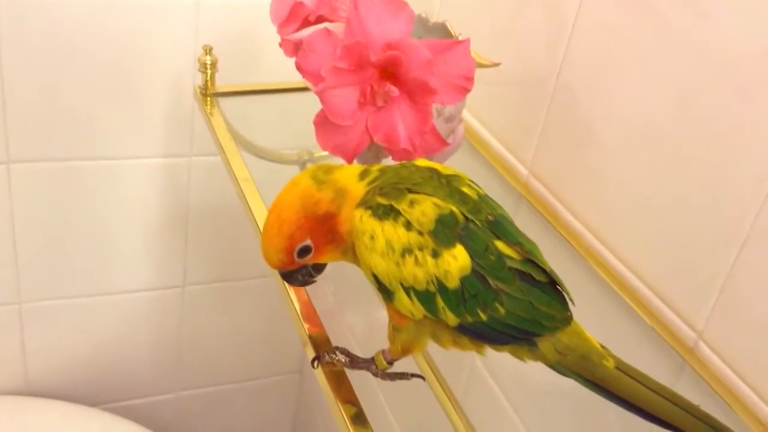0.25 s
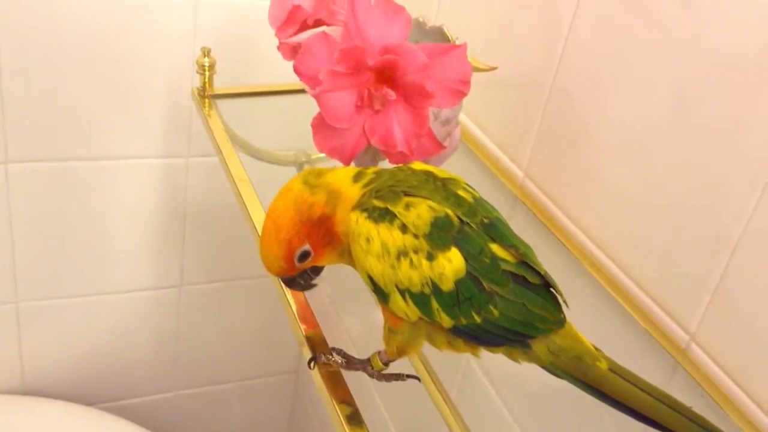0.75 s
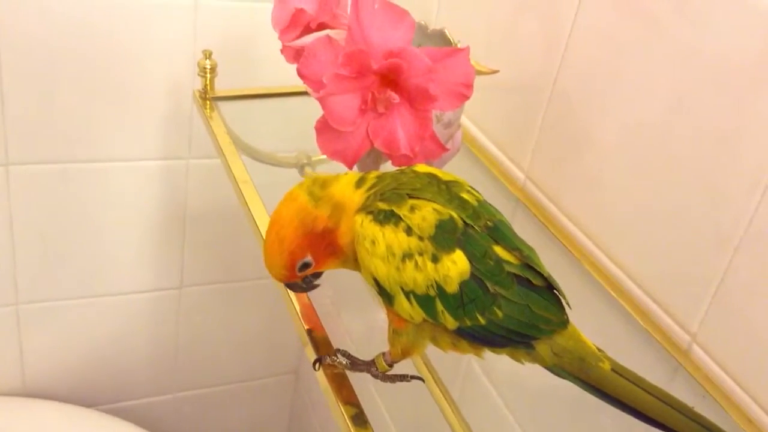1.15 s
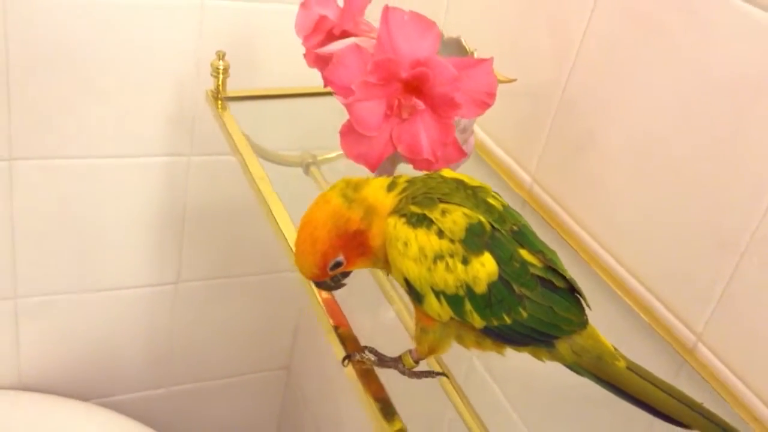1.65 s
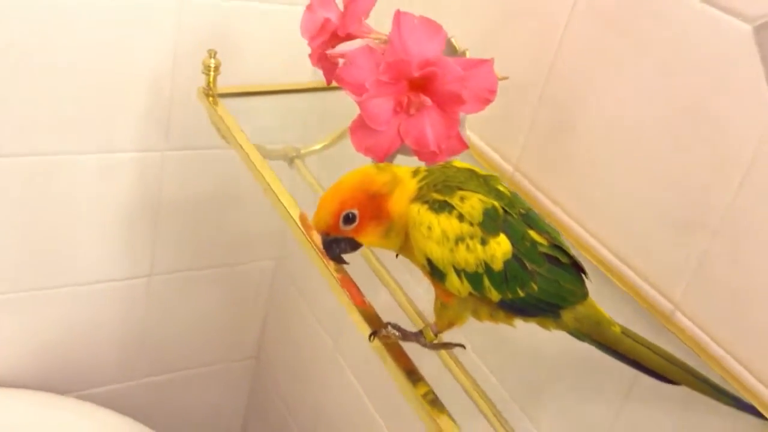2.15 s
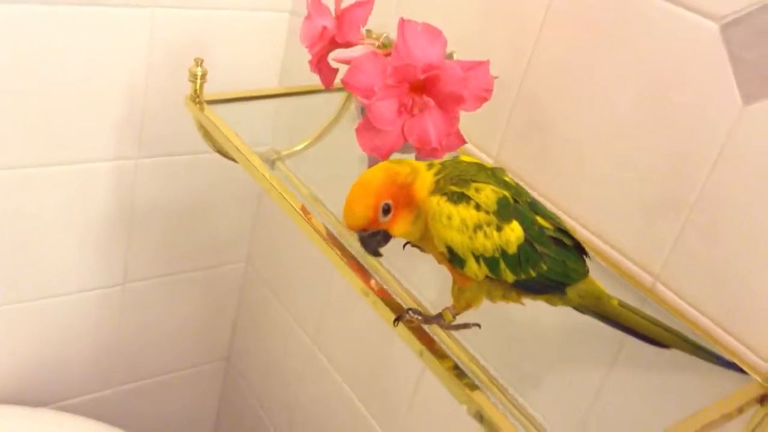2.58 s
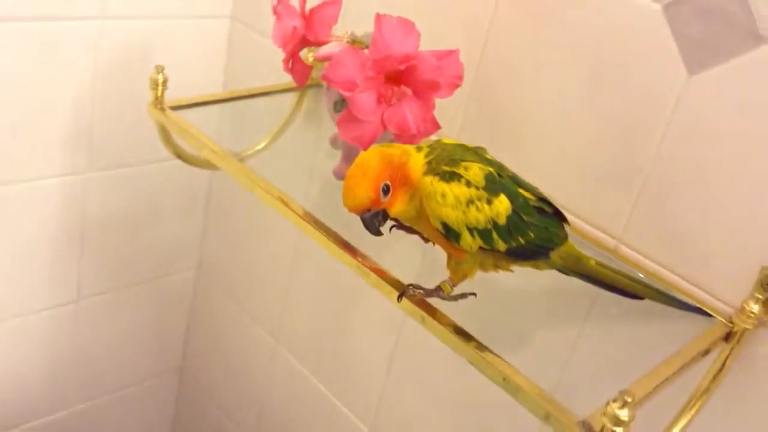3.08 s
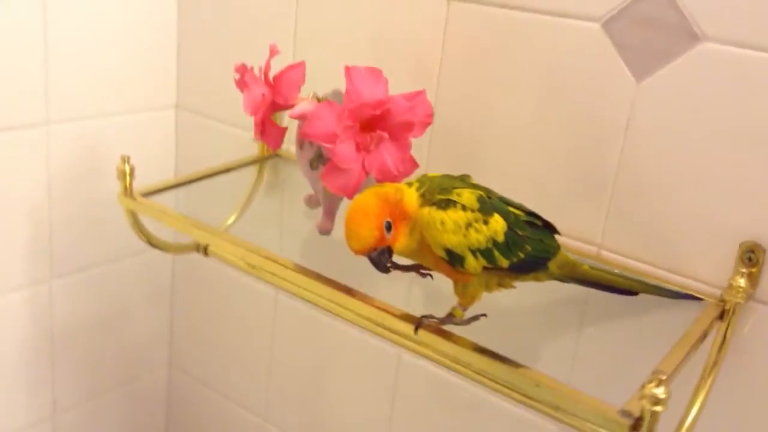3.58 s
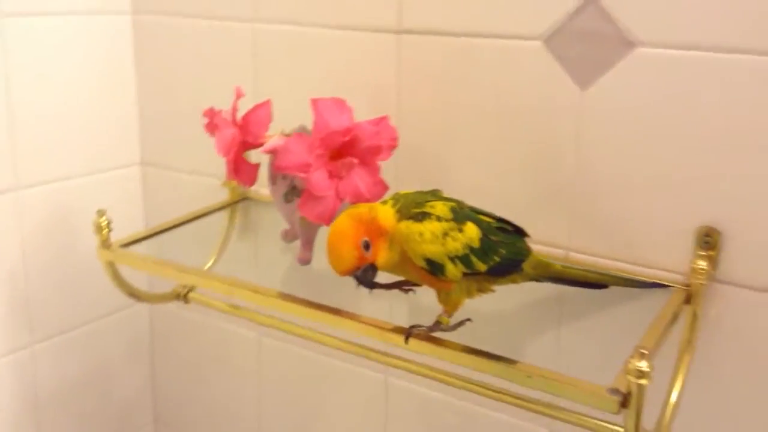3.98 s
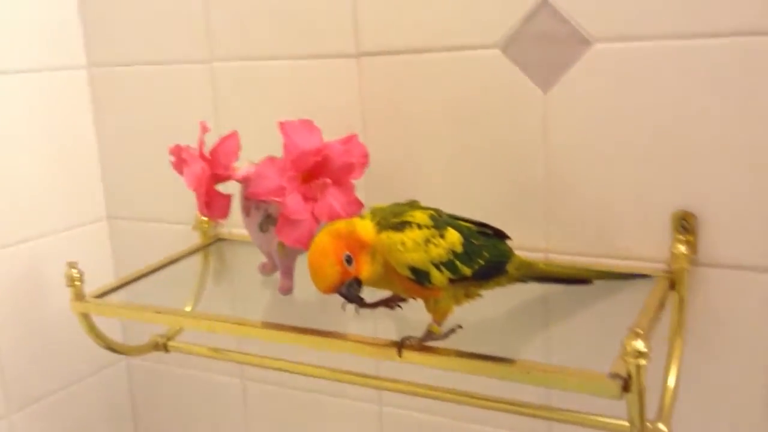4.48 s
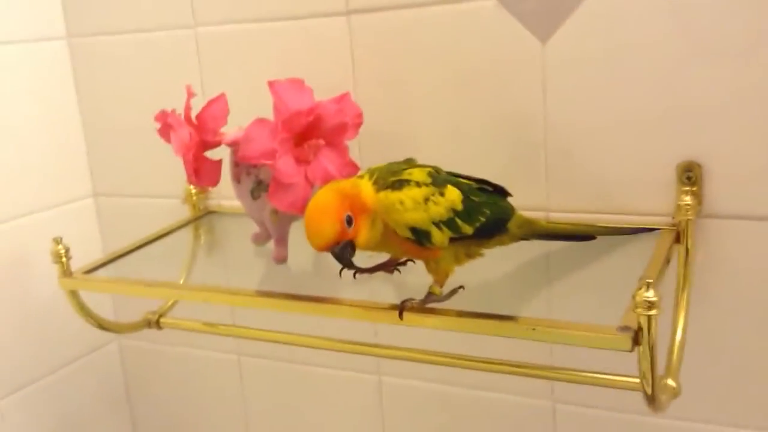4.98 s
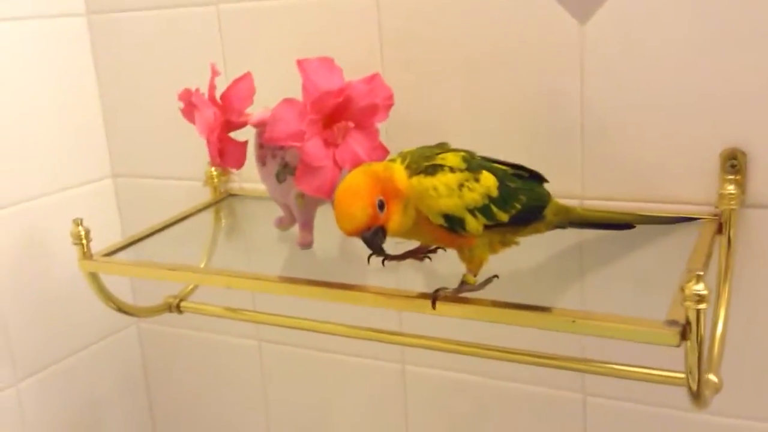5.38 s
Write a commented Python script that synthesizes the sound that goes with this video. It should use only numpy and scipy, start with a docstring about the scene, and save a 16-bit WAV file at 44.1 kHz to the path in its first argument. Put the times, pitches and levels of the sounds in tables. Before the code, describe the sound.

A faint airy hiss with a thin whine and a barely audible wavering hum lies under everything. Bright, ticking splashes begin at about 0.1 s, as a thin trickle breaks into irregular drops in a bathtub. Low bubble chirps bend upward at 0.2 to 0.5 s. A denser cluster peaks near 0.8 to 1.0 s with a hard, wide smack and hollow plinks. Drops continue unevenly, with a crisp splash near 1.4 s and another strong one around 2.15 s. From 3 s, short bubble blips mix with high ticks; a splash pair lands near 3.6 s. Soft dry knocks come close by at 3.8, 4.8 and 5.0 s. A full, round bubble plink stands out at 4.6 s, with more plops at 4.9, 5.2, 5.3 and 5.6 s. Fine spray and falling droplets patter throughout, with short, bright tiled-room reflections.

```python
"""Bright splashes tick first over a faint hum and hiss: a thin trickle breaks into drops above a bathtub.
Splashes are decaying noise bands around a damped ring; some drops trap a bubble, a sine that chirps upward.
Droplets fall back after the splashes, fine spray patters, tiny bubbles ping and dull knocks sound close by.
Random echoes stand for the tub walls and small tiled room; coloured noise and wavering sines lie beneath."""
import sys
import numpy as np
from scipy import signal
from scipy.fft import rfft, irfft
from scipy.io import wavfile

SR = 44100
rng = np.random.default_rng(int(sys.argv[2]) if len(sys.argv) > 2 else 0)


def wrap_up_sound(samples):
    """Save the sound to the file named by the first command line argument, as 16-bit audio."""
    columns = np.atleast_2d(samples).T
    # keep every value between -1 and 1, then stretch to whole-number steps
    tamed = np.clip(columns, -1, 1)
    steps = np.round(tamed * 32767).astype(np.int16)
    wavfile.write(sys.argv[1], SR, steps)


N = 248724  # scene length, samples
T = np.arange(SR // 4) / SR  # time within one event, s
TOP_HZ = 15400  # upper limit of the sound


def undb(db):
    """Decibel law: convert a level in dB to an amplitude factor."""
    return 10 ** (np.asarray(db) / 20)


def fade(t60):
    """Exponential decay: the amplitude falls by 60 dB in t60 seconds."""
    return np.exp(-np.log(1000) * T / t60)


def band(x, lo_hz, hi_hz, order=2):
    """Band limitation: a causal Butterworth band-pass."""
    edges = [lo_hz, min(hi_hz, SR / 2 - 1)]
    return signal.sosfilt(signal.butter(order, edges, "band", fs=SR, output="sos"), x)


def onset_rms(x):
    """Root-mean-square measure of an event's first 20 ms."""
    return np.sqrt(np.mean(x[:SR // 50] ** 2) + 1e-20)


def burst_level(x, db):
    """Level normalisation: set the rms of the first 20 ms to db."""
    return x * undb(db) / onset_rms(x)


def add(out, s, x):
    """Superposition: mix an event in at time s."""
    i = int(np.clip(s * SR, 0, N - 1))
    out[i:i + len(x)] += x[:N - i]


def tiles(x, wet_db, t60, slap_db):
    """Early reflection and reverberation: tub walls slap back, then the tiled room rings; echoes vary by call."""
    grain, tail = rng.standard_normal((2, len(T)))
    # cubing the noise makes the early slaps sparse
    slaps = grain ** 3 * fade(0.061) * (T > .0025)
    tail = tail * fade(t60) * np.minimum(T / 0.019, 1)
    echo = undb(slap_db) * slaps / np.linalg.norm(slaps)
    echo = echo + undb(wet_db) * tail / np.linalg.norm(tail)
    echo[0] += 1  # direct sound
    return signal.fftconvolve(x, echo)[:len(x)]


# Drops that trap a bubble. Columns: t/s, initial f/Hz, level/dB (before the common gain), life/s,
# pitch rise by the end of life/octaves, impact crack level re the tone/dB
BUBBLE_DROPS = [(.193, 753, -48, 0.075, 1.45, -16), (.323, 1833, -54.5, 0.026, 0.38, -9),
                (.482, 793, -51.5, 0.07, 1.6, -3), (.817, 1292, -40, 0.029, 0.19, -6.5),
                (.884, 944, -43, 0.023, 0.26, 2.5), (.900, 1140, -42.5, 0.0095, 0.26, 4.5),
                (1.043, 1134, -44.5, 0.041, 0.17, -3.5), (1.065, 1660, -48, 0.0068, 0.23, -4.5),
                (1.500, 1460, -50, 0.015, 0.5, 13), (1.532, 1412, -45, 0.015, 0.21, -15),
                (1.735, 788, -54, 0.043, 1.5, -25), (1.945, 1116, -60.5, 0.021, 0.04, -23),
                (2.117, 1144, -50, 0.023, 0.16, -15), (2.282, 1252, -54, 0.029, .7, -1),
                (2.369, 1403, -43, 0.025, 0.086, -1.5), (2.460, 1018, -49.5, .019, 0.042, -11),
                (2.552, 1260, -61.5, .02, .1, 2), (3.004, 882, -46, .022, 1.25, -12),
                (3.02, 1962, -45, 0.0044, 0.11, -27), (3.089, 2290, -54, 0.004, .2, -1),
                (3.216, 1558, -43, 0.0067, 0.15, -4.5), (3.510, 798, -50.5, 0.023, 0.055, -13),
                (3.723, 1820, -52, 0.0033, 0.13, -10), (3.803, 739, -55, 0.038, 0.038, -10),
                (3.877, 1367, -53.5, 0.017, 0.91, -2), (4.137, 1360, -44.5, 0.0096, 0.29, -8.5),
                (4.233, 1030, -54.5, 0.0091, 0.19, -12), (4.269, 1430, -61, 0.0098, 0.36, -12),
                (4.309, 1426, -57.5, 0.014, 0.91, -3), (4.467, 732, -44.5, 0.012, 0.039, -23),
                (4.503, 767, -51, 0.021, 0.83, -20), (4.524, 1430, -52, 0.0052, 0.58, -27),
                (4.549, 1373, -51, 0.015, 0.076, -5), (4.632, 867, -37.5, .03, 0.027, -17),
                (4.65, 1364, -47, 0.014, 0.15, -9.5), (4.880, 1249, -44, .034, 0.025, -6),
                (5.233, 900, -43, 0.025, 0.036, -8.5), (5.332, 755, -43.5, 0.041, 1.35, -31),
                (5.63, 765, -43, 0.053, .1, -25)]


def bubbles(sag=0.99, crack_t60=0.0077, burst_db=-13, burst_t60=0.14, gain_db=1):
    """Bubble resonance: after the impact crack, trapped air rings, rises in pitch near the surface and bursts."""
    out = np.zeros(N)
    for s, hz, db, life, octaves, crack_db in BUBBLE_DROPS:
        age = np.minimum(T / max(life, .003), 1.2)  # in lifetimes
        # the fourth power holds the chirp back until late in life
        pitch = hz * 2 ** (octaves * np.minimum(age, 1.05) ** 4)
        attack = 1 - np.exp(-T / 0.0012)
        cutoff = np.clip((1.05 - age) / 0.025, 0, 1)
        swell = attack * np.exp(-sag * age) * cutoff
        tone = np.sin(2 * np.pi * np.cumsum(pitch) / SR) * swell

        impact, froth = rng.standard_normal((2, len(T)))
        crack = band(impact * fade(crack_t60), 0.81 * hz, 1.66 * hz, order=3)
        drop = burst_level(tone, 0) + burst_level(crack, crack_db)

        # the further it has risen, the wetter the spatter as it breaks the surface
        spatter = band(froth ** 3 * fade(burst_t60), 1.3 * hz, 2.48 * hz, order=3)
        spatter = octaves * burst_level(spatter, burst_db)
        drop = drop + np.interp(T - 0.69 * life, T, spatter, left=0)

        # echoes reshape the drop but leave its total energy unchanged
        heard = tiles(drop, wet_db=-1.5, t60=0.2, slap_db=1.5)
        energy = np.linalg.norm(burst_level(drop, db + gain_db))
        add(out, s, heard / np.linalg.norm(heard) * energy)
    return out


# a gentle drop rings on one note, a hard one smacks across the whole range
RING_DB, RING_DB_PER_OCTAVE = 4, -24
TICK_LO_HZ = 8150
WALL_ECHO_S, WALL_ECHO_DB = .008, -13  # nearest side of the tub; the delay varies by splash

# Drops striking the water. Columns: t/s, centre f/Hz, body level/dB,
# spread of the smack either side of f/octaves, level of the sharp tick on top/dB
SPLASH_DROPS = [(0.081, 5800, -49.5, 1.1, -50.5), (.109, 6400, -51.5, 0.6, -59),
                (0.263, 2060, -53.5, 0.39, -65), (0.306, 3540, -52.5, 0.17, -80),
                (.320, 2820, -50, .9, -56.5), (.399, 5160, -42, 0.88, -57), (0.454, 3780, -55.5, .3, -68),
                (.473, 5830, -57, 0.14, -79), (0.568, 12400, -56.5, .12, -69),
                (.633, 11600, -62, 0.29, -50), (0.695, 3420, -52, 0.33, -66), (0.819, 2870, -50, 0.69, -56),
                (0.8845, 5430, -35.5, 0.79, -61), (.937, 5150, -44, 0.46, -50.5),
                (1.133, 5650, -49, 0.65, -59), (1.176, 3900, -51, .95, -57.5),
                (1.359, 4800, -52.5, 0.43, -62), (1.392, 9300, -53.5, 0.49, -61),
                (1.420, 6970, -43, 0.17, -50.5), (1.504, 2840, -53.5, 0.79, -62),
                (1.614, 6700, -51, 0.65, -56), (1.795, 5700, -44.5, 0.42, -56),
                (1.856, 11200, -53.5, .25, -53), (1.943, 4660, -48, 0.11, -70),
                (2.015, 3920, -44.5, 0.42, -65), (2.11, 6950, -54.5, .25, -55.5),
                (2.154, 3990, -38.5, 0.34, -54), (2.223, 3650, -50, 0.37, -57),
                (2.297, 6640, -57, 0.22, -58), (2.326, 8800, -58, 0.12, -55), (2.369, 4740, -54, 0.63, -62),
                (2.492, 5960, -51.5, 0.45, -70), (2.601, 3920, -51, 0.11, -63),
                (2.622, 3800, -43.5, 0.54, -51), (2.712, 3400, -57.5, 0.34, -84),
                (2.807, 11900, -55, 0.37, -54), (2.914, 5400, -58, 0.77, -55), (2.945, 6700, -58, .45, -78),
                (3.022, 5730, -52.5, 0.97, -68), (3.089, 9900, -49.5, 0.37, -49.5),
                (3.322, 4900, -55, 0.54, -70), (3.334, 7950, -49, 0.24, -53), (3.392, 8900, -52, 0.14, -50),
                (3.448, 8300, -56, 0.48, -62), (3.615, 4120, -51.5, 0.081, -74),
                (3.621, 2535, -42, 0.31, -70), (3.663, 2450, -46.5, 0.21, -83),
                (3.671, 3340, -49.5, 0.4, -85), (3.720, 7660, -66, 0.51, -50.5),
                (3.941, 4070, -53.5, .2, -59), (4.121, 6980, -49, 0.12, -60), (4.173, 3260, -51, 0.33, -82),
                (4.346, 7340, -56, 0.34, -64), (4.402, 4240, -49, 0.18, -51.5),
                (4.547, 2180, -60.5, 0.48, -70), (4.569, 2620, -54.5, 0.33, -82),
                (4.682, 7160, -55.5, 0.15, -71), (4.746, 5950, -57.5, .12, -67),
                (4.77, 6900, -55.5, .3, -67), (4.864, 3400, -55, 0.51, -65),
                (4.947, 2240, -52.5, 0.093, -50), (5.036, 6200, -50.5, .25, -55),
                (5.0794, 4100, -43.5, 0.85, -68), (5.232, 2080, -49.5, 0.33, -61),
                (5.439, 7100, -62, 0.091, -57.5)]


def splashes(ring_cycles=45, snap_t60=0.0065, fizz_db=-7, fizz_t60=0.077, skirt_db=-21, skirt_lo_hz=2300):
    """Impact excitation: a smack and fizz of fine droplets surround a tiny, quickly damped bubble's ring."""
    out = np.zeros(N)
    for s, hz, db, spread, tick_db in SPLASH_DROPS:
        smack, droplets = rng.standard_normal((2, len(T)))
        snap = burst_level(smack * fade(snap_t60), 0)
        # the fifth power turns noise into sparse grains
        snap = snap + burst_level(droplets ** 5 * fade(fizz_t60), fizz_db)
        phase = 2 * np.pi * hz * T * (1 + 2 * np.minimum(T, .03))  # glides up at first
        ring = np.sin(phase) * fade(ring_cycles / hz)

        ratio = 2 ** max(spread, .05)
        core = burst_level(band(snap, hz / ratio, hz * ratio, order=3), 0)
        skirt = burst_level(band(snap, skirt_lo_hz, TOP_HZ, order=3), skirt_db)
        ring = burst_level(band(ring, hz / 2, hz * 2), RING_DB + RING_DB_PER_OCTAVE * spread)
        body = core + skirt + ring
        tick = band(snap, TICK_LO_HZ, TOP_HZ, order=3)

        lag = int(WALL_ECHO_S * SR * rng.uniform(0.86, 1.3))
        for part, part_db in (body, db), (tick, tick_db):
            part = part + undb(WALL_ECHO_DB) * np.pad(part, (lag, 0))[:len(T)]
            heard = tiles(part, wet_db=-3.5, t60=0.14, slap_db=0)
            add(out, s, burst_level(heard, part_db))
    return out


def falling_droplets(count=3, db=-15, delay_s=.012, flight_s=.09, octaves=0.72, ring_cycles=30, rough=0.24):
    """Secondary impact: each splash throws up smaller droplets, which tick back onto the water just after it."""
    out = np.zeros(N)
    for s, hz, splash_db, *_ in SPLASH_DROPS:
        for when, size, strength in rng.random((count, 3)):
            pitch = np.clip(hz * 2 ** (octaves * (2 * size - .5)), 2300, 14000)
            tick = np.sin(2 * np.pi * pitch * T) + rough * rng.standard_normal(len(T))
            tick = tick * fade(ring_cycles / pitch)
            # db re the splash is the upper limit, before filtering and echoes
            add(out, s + delay_s + flight_s * when, burst_level(tick, splash_db + db) * strength)
    return tiles(band(out, 2500, TOP_HZ, order=3), wet_db=-14.5, t60=0.09, slap_db=-3)


def small_bubbles(count=24, db=-63, lo_hz=1200, hi_hz=3000, ring_cycles=40, octaves_per_s=6):
    """Damped resonance: faint little bubbles ping at random, each gliding slightly upward."""
    out = np.zeros(N)
    for when, size, strength in rng.random((count, 3)):
        hz = lo_hz * (hi_hz / lo_hz) ** size
        pitch = hz * 2 ** (octaves_per_s * T)
        ping = np.sin(2 * np.pi * np.cumsum(pitch) / SR) * fade(ring_cycles / hz)
        # db is the upper limit, before echoes
        add(out, when * N / SR, burst_level(ping, db) * strength)
    return tiles(out, wet_db=7.5, t60=0.44, slap_db=-0.5)


def spray(count=380, db=-65.5, lo_hz=2200, hi_hz=14500):
    """Random impact process: fine droplets patter at independent times, pitches and strengths."""
    out = np.zeros(N)
    for when, size, strength in rng.random((count, 3)):
        hz = lo_hz * (hi_hz / lo_hz) ** size
        tick = np.sin(2 * np.pi * hz * T) + 0.55 * rng.standard_normal(len(T))
        tick = tick * fade(25 / hz)
        # db holds at strength 0.71, before filtering and echoes
        add(out, when * N / SR, burst_level(tick, db) * 2 * strength ** 2)
    return tiles(band(out, 1400, TOP_HZ), wet_db=-15.5, t60=0.06, slap_db=-1.5)


# Dull knocks close by. Columns: t/s, level/dB, f/Hz
KNOCK_EVENTS = [(3.761, -57, 490), (4.801, -61.5, 517), (4.824, -62, 586), (4.969, -51.5, 540)]


def knocks(t60=0.0039, click=0.78, click_t60=0.021):
    """Heavily damped vibration: a short sine and decaying noise make dry bumps without echoes."""
    out = np.zeros(N)
    for s, db, hz in KNOCK_EVENTS:
        bump = np.sin(2 * np.pi * hz * T) * fade(t60)
        bump = bump + click * rng.standard_normal(len(T)) * fade(click_t60)
        add(out, s, burst_level(band(bump, 193, 2100), db))
    return out


AIR_DB = -60.5  # rms level of the whole hiss

# Spectrum of the airy hiss. Columns: f/Hz, relative level per Hz/dB
AIR_SPECTRUM = [(25, -29), (66, -18), (170, -1.5), (300, 4), (430, 0.5), (700, -0.5), (1500, -1.5),
                (2000, 0.5), (3100, -3.5), (3700, 5), (4350, 7.5), (5300, -7), (6500, -0.5), (10000, -4.5),
                (15500, -10.5)]
# Narrow resonances that sing in the hiss. Columns: centre f/Hz, width/Hz, level over the hiss/dB
WHINE_RESONANCES = [(1746, 33, 10), (2850, 32, 9.5)]
# Partials of the fan hum. Columns: f/Hz, rms level before wavering/dB
HUM_PARTIALS = [(120, -96), (280, -84.5), (326, -79), (515, -82.5), (571, -85)]


def room_tone(waver=0.32):
    """Spectral shaping and slow modulation: airy hiss with a thin whine, and the wavering hum of a fan."""
    hz, db = np.transpose(AIR_SPECTRUM)
    f = np.fft.rfftfreq(N, 1 / SR)
    sing = 1  # power gain of the resonances
    for centre, width, over_db in WHINE_RESONANCES:
        sing = sing + undb(over_db) ** 2 / (1 + (2 * (f - centre) / width) ** 2)
    colour = undb(np.interp(np.log(f + 1), np.log(hz), db)) * np.sqrt(sing)
    air = irfft(rfft(rng.standard_normal(N)) * colour, N)

    t = np.arange(N) / SR
    knots = np.linspace(0, t[-1], 40)
    hum = 0
    for hz, db in HUM_PARTIALS:
        swell, drift = (np.interp(t, knots, walk) for walk in rng.standard_normal(size=(2, 40)))
        tone = np.sin(2 * np.pi * hz * t + 0.72 * drift)
        hum = hum + np.sqrt(2) * undb(db) * (1 + waver * swell) * tone
    return air / air.std() * undb(AIR_DB) + hum


def scene():
    """Linear superposition: all the water and knocks over the room's own sound."""
    water = bubbles() + splashes() + falling_droplets() + small_bubbles() + spray()
    return (water + knocks() + room_tone())[None]


def record(dry):
    """Low-pass filtering: a steep elliptic filter cuts the top."""
    return signal.sosfilt(signal.ellip(10, .2, 70, TOP_HZ, fs=SR, output="sos"), dry)


dry = scene()
out = record(dry)
wrap_up_sound(out)
```